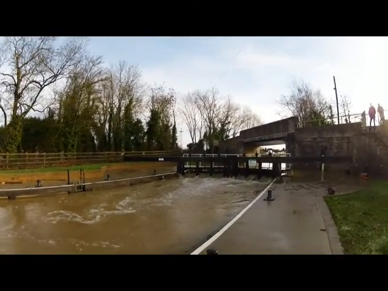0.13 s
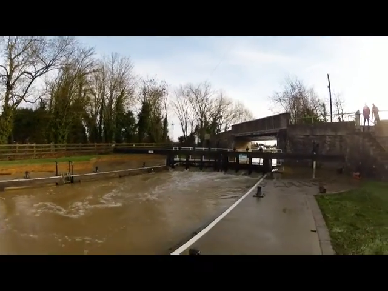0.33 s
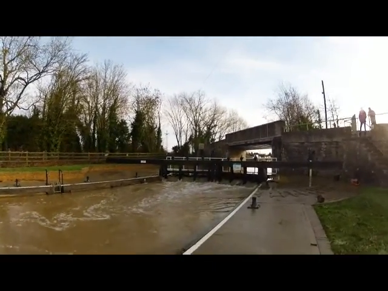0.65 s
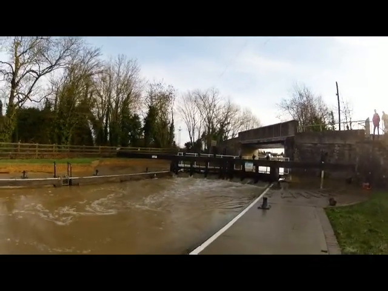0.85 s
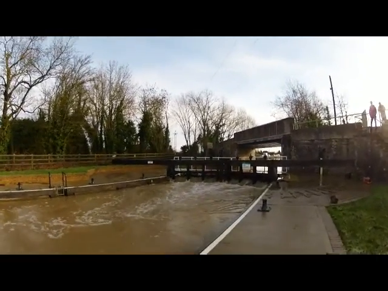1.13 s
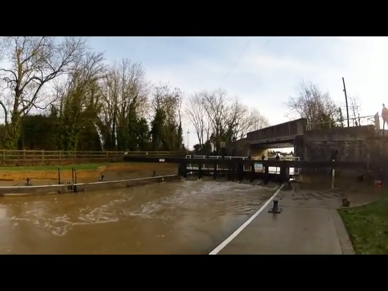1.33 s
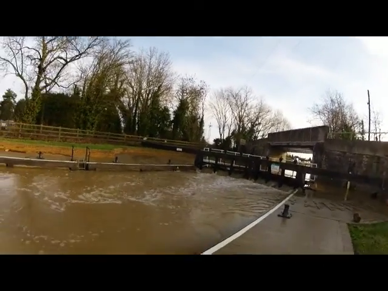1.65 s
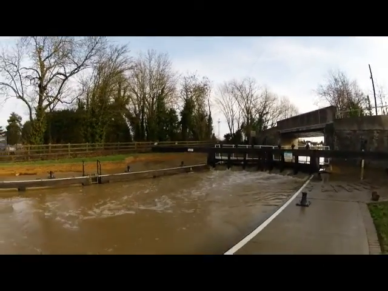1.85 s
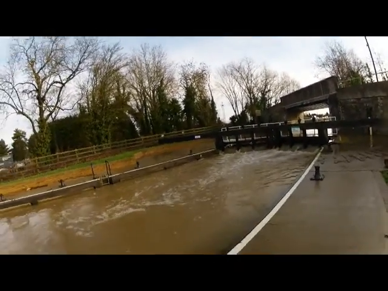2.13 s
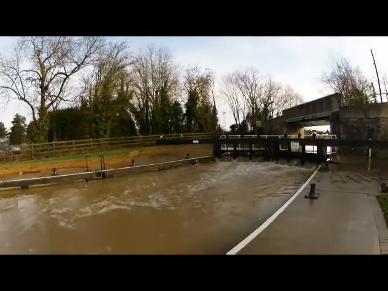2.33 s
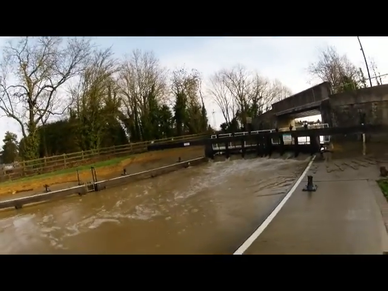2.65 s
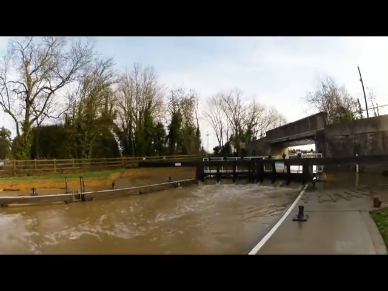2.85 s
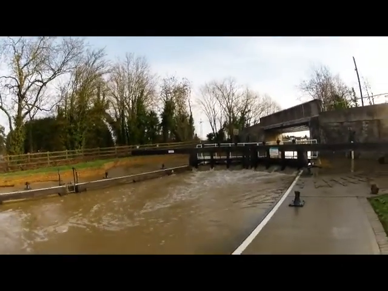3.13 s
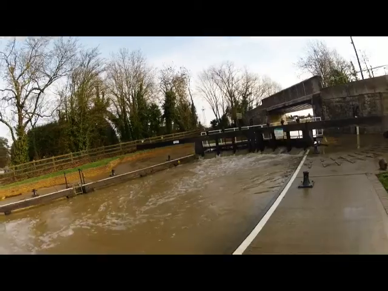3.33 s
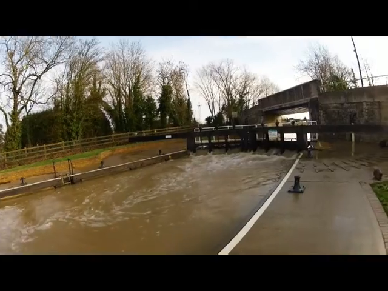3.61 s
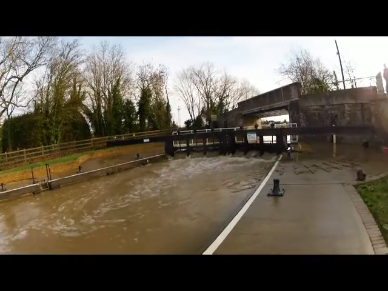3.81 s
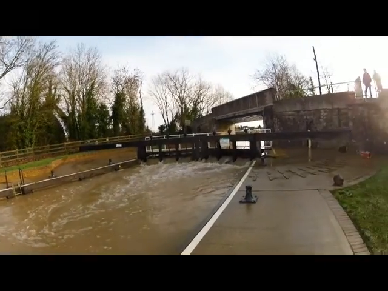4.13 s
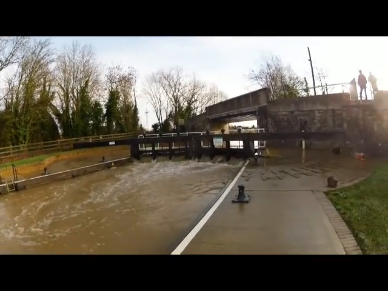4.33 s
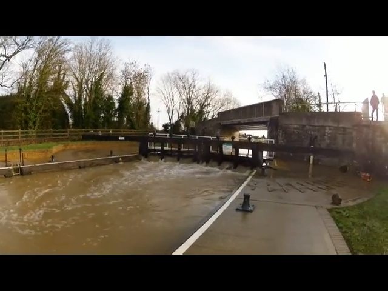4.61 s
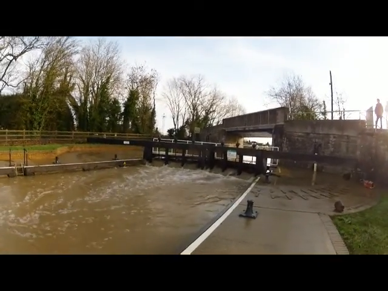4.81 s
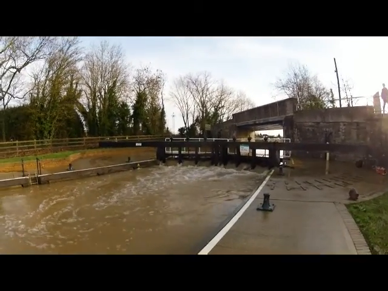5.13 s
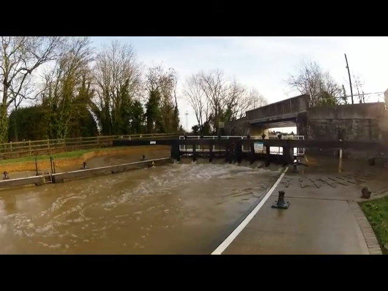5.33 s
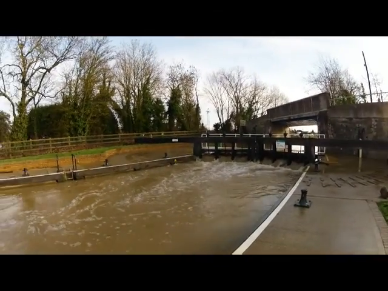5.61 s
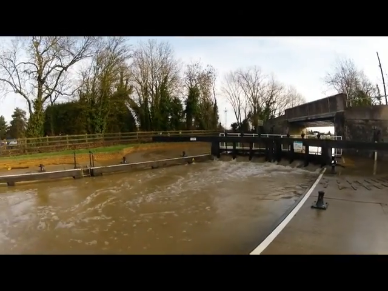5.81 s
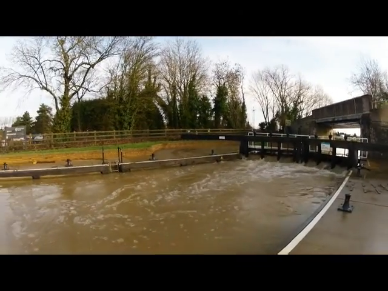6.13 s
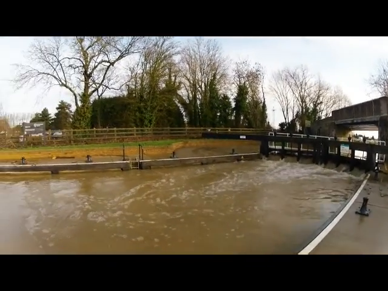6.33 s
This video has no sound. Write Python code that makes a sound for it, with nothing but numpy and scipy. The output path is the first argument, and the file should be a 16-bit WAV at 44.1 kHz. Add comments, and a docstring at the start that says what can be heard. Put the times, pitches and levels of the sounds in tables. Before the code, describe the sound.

Outdoors by a river lock, quiet continuous water noise with a dull, enclosed tone. Then close fingers scrape and knock the microphone's plastic case for nearly two seconds, with bassy wall flexing, uneven stick-slip rubs, small squeaks, a click and a hard knock, ending in a strong rasp. Afterwards only the distant water remains, steady, with sparse light case ticks and one sharper tick near the end.

```python
"""Floodwater pours steadily through lock gates some way off, heard inside a small camera's plastic housing:
filtered noise and bubble grains in three bands. At about 1.2 s a hand shifts its grip: knocks excite the case
modes, stick-slip noise through the same modes rubs and rasps, low noise flexes the walls, and bursts of
band-passed noise squeak, with one broad click near 2.05 s. From about 3 s the hand is gone and the mount
ticks a few times, loudest near 6 s."""
import sys
import numpy as np
from scipy import signal
from scipy.fft import rfft, irfft, next_fast_len
from scipy.io import wavfile

SR = 44100
rng = np.random.default_rng(int(sys.argv[2]) if len(sys.argv) > 2 else 0)


def pcm_store(signal):
    """Save signal as 16-bit PCM."""
    levels = np.round(np.clip(np.atleast_2d(signal), -1, 1) * 32767)
    wavfile.write(sys.argv[1], SR, levels.astype(np.int16).T)


N = 285327
T = np.arange(N) / SR
# the hand takes hold of the case, stays on it and lets go
GRIP_S, GRIP_HOLD_S, GRIP_FADE_S = 1.218, 1.715, 0.021


def undb(db):
    """Amplitude gain is 10 to the power dB / 20."""
    return 10 ** (np.asarray(db) / 20)


def level(x, db=0):
    """Normalise to unit rms, then apply a steady or moving gain in dB."""
    return x * undb(db) / np.sqrt(np.mean(x ** 2) + 1e-20)


def band(x, lo_hz, hi_hz, order=2):
    """Causal Butterworth band-pass: flat between its two cut-offs."""
    edges_hz = [lo_hz, min(hi_hz, SR / 2 - 1)]
    return signal.sosfilt(signal.butter(order, edges_hz, "band", fs=SR, output="sos"), x)


def resonate(x, hz, width_hz):
    """A single damped resonator, with gain 1 at its centre."""
    b, a = signal.iirpeak(hz, hz / width_hz, fs=SR)
    return signal.lfilter(b, a, x + 1e-18)


def colour(x, points):
    """Spectral shaping: (pitch_hz, level_db) points joined along a logarithmic frequency axis."""
    hz, db = np.transpose(points)
    size = next_fast_len(len(x), True)
    bins_hz = np.arange(size // 2 + 1) * SR / size
    gain = undb(np.interp(np.log(bins_hz + 1), np.log(hz), db))
    return irfft(rfft(x, size) * gain, size)[:len(x)]


def walk(rate, size=N):
    """Slow random modulation: independent values, rate per second, joined by lines; spread near 1."""
    steps = 1.47 * rng.standard_normal(1024)
    return np.interp(T[:size] * rate, np.arange(len(steps)), steps)


def grains(rate, spread_db, size=N):
    """Shot noise: random impulses, rate per second on average, most small and a few large."""
    place, sign, strength = rng.random((3, size))
    hit = place < rate / SR
    out = np.zeros(size)
    out[hit] = np.sign(sign[hit] - .5) * undb(-spread_db * np.log(strength[hit] + 0.037))
    return level(out)


def water():
    """Turbulence gives broadband noise and bubbles give impulses; the housing's air resonances colour both."""
    # spectrum through the housing wall: pitch_hz [Hz], level_db [dB per Hz, relative]
    wall_spectrum = [(25, 9.5), (48, 3.5), (90, 1.5), (250, -1.5), (520, -4.5), (760, -3.5), (980, -12.5),
                     (1400, -8), (1850, -3.5), (2850, 2), (3800, -9.5), (7800, -22), (9300, -20.5),
                     (15000, -41)]
    # air resonances inside the housing: pitch_hz [Hz], width_hz [Hz], level_db [dB]
    cavity_modes = [(880, 93, 0), (1807, 320, 2.5), (2394, 240, -4), (2795, 144, -7), (9750, 940, 13),
                    (14710, 430, 33)]
    # each part of the water: level_db [dB], change_db once the grip has shifted [dB]
    roar_levels = (-59, -0.85)
    splash_levels = (-59.5, 1.68)
    rumble_levels = (-60, -3)
    split_hz = 970

    turbulence = rng.standard_normal(N)
    bubbles = 0.48 * grains(1500, 2.3)
    direct = colour(turbulence + bubbles, wall_spectrum)
    rush = direct + sum(undb(db) * resonate(direct, hz, width_hz) for hz, width_hz, db in cavity_modes)

    # roar and splash share one slow surge; each part also wavers on its own
    surge_db = 0.322 * walk(1.12)
    rumble = band(rush, 15.7, 54.7) * undb(1.36 * walk(8.1) + 0.53 * walk(0.94))
    roar = band(rush, 55, split_hz, order=3) * undb(surge_db + .8 * walk(8.9))
    splash = band(rush, split_hz, 19000, order=3) * undb(surge_db + 0.35 * walk(8.6))

    shifted = np.clip((T - GRIP_S) / GRIP_HOLD_S, 0, 1)
    out = np.zeros(N)
    for part, (db, change_db) in [(roar, roar_levels), (splash, splash_levels), (rumble, rumble_levels)]:
        out += level(part, db + change_db * shifted)
    return out


def case(push, roam_db=0):
    """Modal synthesis: the plastic case rings in its modes; a roaming contact shifts their balance."""
    # modes of the plastic case: pitch_hz [Hz], t60_s [s], level_db [dB]
    case_modes = [(170, .014, -16), (340, .05, -8), (470, .018, -9), (600, .018, -3), (715, .026, -1),
                  (870, .014, -14), (1050, .016, -11), (1380, .014, -8), (1600, .012, -12), (1850, .02, -4),
                  (2200, .012, -21), (2740, .02, -11), (3100, .012, -20), (3450, .012, -17),
                  (3750, .012, -23), (4800, .006, -29), (7200, .01, -36), (8450, .016, -27),
                  (9240, .025, -21), (10120, .02, -20), (10620, .015, -25), (11280, .026, -17),
                  (12720, .026, -17), (13400, .012, -25), (13830, .018, -18), (14770, .02, -20)]
    out = 0
    for k, (hz, t60_s, db) in enumerate(case_modes):
        roam = roam_db * walk(14.1, size=len(push)) if roam_db else 0
        width_hz = np.log(1000) / np.pi / t60_s  # damping sets the bandwidth
        # neighbouring modes move the wall in opposite directions
        out = out + (-1) ** k * undb(db + roam) * resonate(push, hz, width_hz)
    return out


def knocks():
    """Impact excitation: each contact strikes the case, scrapes for an instant and rebounds."""
    # knocks and ticks on the case: start_s, thud_db, body_db, clack_db [s, dB, dB, dB]
    taps = [(1.1881, -52, -58, -60), (1.215, -56, -66, -64), (1.2229, -45.5, -53, -61.5),
            (1.2486, -67, -64, -70), (1.6896, -61, -52, -64), (1.78, -59, -44.5, -42.5),
            (1.8389, -58, -49.5, -44), (1.949, -48, -30.5, -45.5), (2.046, -60, -60, -52.5),
            (2.293, -42.5, -24.5, -31), (2.984, -66, -67, -77), (3.7268, -79, -61.5, -70),
            (3.9029, -75, -58, -65.5), (4.7868, -80, -65.5, -71), (6.0187, -54.5, -47, -58)]
    # ranges of a knock's thud, body, clack and tick: low_hz, high_hz [Hz]
    knock_bands = [(60, 425), (450, 1080), (1200, 4100), (7000, 14700)]
    tick_db = -7.5  # the treble of a knock, relative to its clack
    crack_db = -40.5  # the part of a blow that comes straight through the wall
    rebound_s, rebound_share = .00287, 0.15
    scrape_share, scrape_decay_s = .025, 0.0037  # relative to the strike

    out = np.zeros(N)
    t = T[:SR // 10]
    lead = SR // 100  # samples of silence, room for the backward filter
    times, thud_db, body_db, clack_db = np.transpose(taps)
    push = scrape_share * rng.standard_normal((len(times), len(t))) * np.exp(-t / scrape_decay_s)
    push[:, 0] += 1
    push[:, int(rebound_s * SR)] += rebound_share
    ring = np.pad(case(push) + undb(crack_db) * push, ((0, 0), (lead, 0)))

    levels_db = (thud_db, body_db, clack_db, clack_db + tick_db)
    for band_db, (lo_hz, hi_hz) in zip(levels_db, knock_bands):
        # filtered both ways, so that low and high modes start together
        forward = band(ring, lo_hz, hi_hz)
        parts = band(forward[:, ::-1], lo_hz, hi_hz)[:, ::-1]
        for start_s, db, part in zip(times, band_db, parts):
            start = int(start_s * SR) - lead
            out[start:start + len(part)] += level(part, db)
    return out


def touch(start_s, hold_s, attack_s, release_s):
    """Contact envelope: a linear rise, and an exponential decay from hold_s after the start."""
    since = T - start_s
    return np.clip(since / attack_s, 0, 1) * np.exp(-np.maximum(since - hold_s, 0) / release_s)


def effort(rows, rest_db, attack_s, release_s):
    """Powers add: (start_s, hold_s, level_db) contacts on top of the resting hand, as a level in dB."""
    power = (undb(rest_db) * touch(GRIP_S, GRIP_HOLD_S, GRIP_FADE_S, GRIP_FADE_S)) ** 2
    for start_s, hold_s, db in rows:
        power = power + (undb(db) * touch(start_s, hold_s, attack_s, release_s)) ** 2
    return 10 * np.log10(power + 1e-20)


def fingers():
    """Stick-slip friction drives the case modes in uneven runs; the grip bends the walls with a low rumble."""
    # finger strokes over the case: start_s, hold_s [s], friction_db, rasp_db, palm_db [dB]
    strokes = [(1.198, 0.096, -41.5, -53, -39.5), (1.272, 0.18, -39, -46, -44.5),
               (1.457, 0.04, -43, -45, -55), (1.571, 0.071, -37, -48.5, -41.5),
               (1.677, 0.1, -40, -48.5, -48.5), (1.817, 0.23, -44, -54.5, -46), (2.158, .14, -50, -46, -59),
               (2.37, 0.018, -59, -43.5, -53.5), (2.433, 0.16, -48.5, -49.5, -51),
               (2.619, 0.14, -42, -46, -71), (2.737, 0.098, -33, -34.5, -47)]
    # squeezes that bend the walls: start_s, hold_s [s], level_db [dB]
    squeezes = [(1.222, 0.01, -31.5), (1.31, 0.065, -51), (1.61, 0.055, -44), (1.882, 0.058, -36),
                (2.065, 0.051, -38), (2.15, 0.063, -48), (2.465, 0.096, -48)]
    stroke_attack_s, stroke_release_s = 0.033, 0.032
    squeeze_attack_s, squeeze_release_s = 0.0063, 0.024
    # between strokes the resting hand still creeps
    rest_friction_db, rest_rasp_db, rest_palm_db, rest_flex_db = -45.5, -59, -53, -55.5
    grit_offset_db = -13  # relative to the mean of the friction and rasp levels
    hiss_offset_db = 2  # skin hiss relative to the grit

    touching = (T > GRIP_S) & (T < GRIP_S + GRIP_HOLD_S + .1)
    starts, holds, *stroke_levels = np.transpose(strokes)
    rest_levels = (rest_friction_db, rest_rasp_db, rest_palm_db)
    friction_db, rasp_db, palm_db = [
        effort(zip(starts, holds, db), rest_db, stroke_attack_s, stroke_release_s)[touching]
        for db, rest_db in zip(stroke_levels, rest_levels)]
    flex_db = effort(squeezes, rest_flex_db, squeeze_attack_s, squeeze_release_s)[touching]

    slips = grains(3500, 2) + 0.67 * rng.standard_normal(N)
    slips = (slips * undb(1.6 * walk(110)))[touching]
    modes = case(slips, roam_db=2.5)
    # soft skin damps the case's loudest ring, and some scraping comes straight through the wall
    ring = modes - .45 * resonate(modes, 665, 250) + undb(-19.5) * slips

    friction = level(band(ring, 530, 1527), friction_db)
    rasp = level(band(ring, 1360, 2550), rasp_db)
    palm = level(band(ring, 290, 410), palm_db)
    grit_db = (friction_db + rasp_db) / 2 + grit_offset_db
    grit = level(band(modes, 3900, 15500, order=3), grit_db)
    hiss = level(band(slips, 10000, 13000), grit_db + hiss_offset_db)

    # the walls sway to and fro at an unsteady rate; the power evens out the swings
    sway = signal.hilbert(band(rng.standard_normal(N), 30.5, 76.9, order=3)[touching])
    flex = level(np.real(sway / np.abs(sway) ** .7), flex_db)

    out = np.zeros(N)
    out[touching] = friction + rasp + grit + hiss + palm + flex
    return out


def squeaks_and_click():
    """Stick-slip as band-passed noise in a bell envelope: a narrow band squeaks, a broad, brief one clicks."""
    # a fingertip catches and sings; at 2.049 s it only clicks: a broad, very short noise burst.
    # middle_s [s], spread_s of the bell [s], pitch_hz, width_hz [Hz], level_db before the bell [dB]
    catches = [(1.334, 0.047, 1236, 155, -36), (1.433, 0.023, 1230, 206, -40),
               (2.049, 0.0012, 4130, 2200, -40.5), (2.38, 0.0042, 510, 204, -35),
               (2.552, 0.093, 1813, 222, -47), (2.796, 0.039, 1890, 304, -43),
               (2.848, 0.015, 3440, 400, -47), (2.876, 0.0095, 1850, 99, -41)]
    out = np.zeros(N)
    t = T[:SR // 2] - .25  # time from the middle of the burst
    noises = rng.standard_normal((len(catches), len(t)))
    for (middle_s, spread_s, hz, width_hz, db), slips in zip(catches, noises):
        start = int((middle_s + t[0]) * SR)
        burst = level(band(slips, hz - width_hz / 2, hz + width_hz / 2), db)
        out[start:start + len(t)] += burst * np.exp(-.5 * (t / spread_s) ** 2)
    return out


def scene():
    """Superposition: distant water under the handling of the camera, in one channel."""
    return (water() + knocks() + fingers() + squeaks_and_click())[None]


def record(dry):
    """Port interference weakens one frequency and its octave; a steep low-pass limits the bandwidth."""
    port_null_hz, top_hz = 5977, 15400
    for hz, width_hz, depth in [(port_null_hz, 800, .62), (2 * port_null_hz, 650, .7)]:
        for _ in range(2):
            dry = dry - depth * resonate(dry, hz, width_hz)
    return signal.sosfilt(signal.ellip(8, .2, 70, top_hz, fs=SR, output="sos"), dry)


dry = scene()
out = record(dry)
pcm_store(out)
```